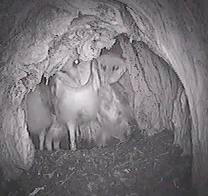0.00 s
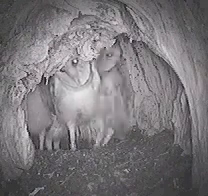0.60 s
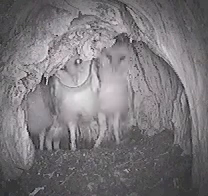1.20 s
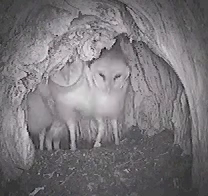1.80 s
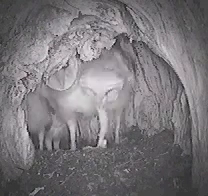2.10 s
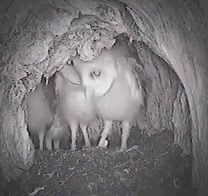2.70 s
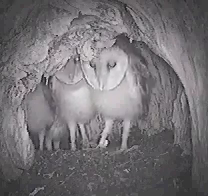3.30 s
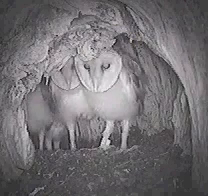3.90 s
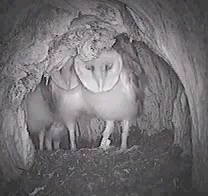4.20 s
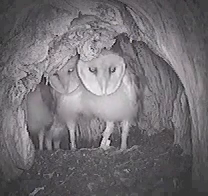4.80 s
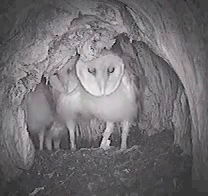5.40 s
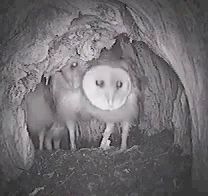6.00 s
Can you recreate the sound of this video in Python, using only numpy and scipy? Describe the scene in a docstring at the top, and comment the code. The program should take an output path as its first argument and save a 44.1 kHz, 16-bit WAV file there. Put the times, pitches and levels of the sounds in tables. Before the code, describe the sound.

Inside a hollow tree, a barn owl chick begs close to a nest camera's microphone. It gives five rasping hisses, about one a second, each swelling and breaking off. A soft bill cluck follows each of the last two. Then a second chick further back gives one weaker, thinner hiss. The sound is quiet and nearly dry, over a steady hush with a trace of electrical hum.

```python
"""Five rasping hisses swell and break off: a barn owl chick begs in a hollow tree, by a nest camera.
Soft bill clucks follow the last two, then a weaker, thinner hiss comes from a chick further back.
Each hiss is air chopped by an uneven flutter of the syrinx and coloured by the throat.
The hollow hums along with the near chick, over a steady hush and a trace of electrical hum."""
import sys
import numpy as np
from scipy import signal
from scipy.fft import rfft, irfft
from scipy.io import wavfile
from scipy.ndimage import uniform_filter1d

SR = 44100
rng = np.random.default_rng(int(sys.argv[2]) if len(sys.argv) > 2 else 0)


def store_pcm(level_fs):
    """Save levels as 16-bit WAV."""
    pcm = np.round(np.clip(level_fs, -1, 1) * 32767).astype(np.int16)
    wavfile.write(sys.argv[1], SR, np.atleast_2d(pcm).T)


N = 268480
TIME = np.arange(N) / SR
BIN_HZ = np.fft.rfftfreq(N, 1 / SR)


def amp(db):
    return 10 ** (np.asarray(db) / 20)


def unit_rms(x):
    return x / np.sqrt(np.mean(x ** 2) + 1e-20)


def eq_curve(points):
    """Gain per bin from points joined on a log-frequency axis."""
    hz, db = np.transpose(points)
    return amp(np.interp(np.log(BIN_HZ + 1), np.log(hz), db))


def resonances(modes):
    """Gain per bin of a set of steep-sided resonances."""
    power = sum(amp(db) ** 2 / (1 + ((BIN_HZ - hz) / width) ** 2) ** 4 for hz, width, db in modes)
    return np.sqrt(power)


def colour(x, gain):
    """Minimum-phase filter with the given gain per bin; the result has unit rms."""
    log_gain = np.log(np.maximum(gain / gain.max(), 1e-5))
    mirrored = np.concatenate([log_gain, log_gain[-2:0:-1]])
    phase = -signal.hilbert(mirrored).imag[:len(gain)]
    return unit_rms(irfft(rfft(x) * gain * np.exp(1j * phase), N))


def background(hush_db=-65.5):
    """The bed: an even hush and a trace of electrical hum."""
    # tone of the hush: freq_hz, gain_db
    hush_eq = [(30, -13.5), (100, -12), (160, -7.5), (250, -1.5), (370, 1), (600, -3.5), (800, -5.5),
               (1150, -3), (1900, -3.5), (2600, -7.5), (4200, -9), (7000, -17.5), (9300, -25.5),
               (10500, -34.5)]
    # partials of the hum: pitch_hz, rms_db
    hum_partials = [(65.5, -88.5), (131, -97.5)]
    hush = amp(hush_db) * colour(rng.standard_normal(N), eq_curve(hush_eq))
    hum = sum(amp(db) * np.sqrt(2) * np.sin(2 * np.pi * hz * TIME) for hz, db in hum_partials)
    return hush + hum


def tree_reverb(x, wet_db=-20, t60_s=0.098, predelay_s=0.002):
    """Rotten wood and litter add only a short, weak tail."""
    t = TIME[:SR // 4]
    tail = rng.standard_normal(len(t)) * amp(-60 * t / t60_s) * (t > predelay_s)
    return x + amp(wet_db) * signal.fftconvolve(x, tail / np.linalg.norm(tail))[:N]


def bill_clucks(rise_s=0.0042, sag=0.19, sag_s=0.011, overtone_db=-7, overtone_s=0.025):
    """The bill shuts after a call: a brief falling note whose overtone dies first."""
    # soft clucks: start_s, level_db, pitch_hz
    clucks = [(3.563, -56, 1117), (4.513, -56, 1122)]
    out = np.zeros(N)
    for start_s, level_db, pitch_hz in clucks:
        age = np.maximum(TIME - start_s, 0)
        glide_hz = pitch_hz * (1 - sag * (1 - np.exp(-age / sag_s)))
        phase = 2 * np.pi * np.cumsum(glide_hz) / SR
        note = np.sin(phase) + amp(overtone_db) * np.exp(-age / overtone_s) * np.sin(2 * phase)
        out += amp(level_db) * age / rise_s * np.exp(1 - age / rise_s) * note
    return out


def hiss_stages(start_s, length_s, attack_s, release_s, tail_s, crest_share, level_db, swell_db,
                crest_gape_db, break_gape_db, crest_edge_db, break_edge_db):
    """Times, level, gape and edge of a hiss; gape is its middle band against the whole, edge its top."""
    crest_s = min(crest_share, 1) * length_s
    released_s = length_s + release_s
    # seven stages: first air, rasp catches, swell begins, crest, break, released, rest
    times = start_s + np.array([-0.057, 0, attack_s, crest_s, length_s, released_s, released_s + tail_s])
    levels_db = level_db + np.array([-33, -16.5 - swell_db, -swell_db, 0, -1, -22.5, -33])
    slack_db = -3.5  # gape while the syrinx is slack
    gape_db = [slack_db, slack_db, -4, crest_gape_db, break_gape_db, slack_db, slack_db]
    edge_db = [-2.5, -2.5, -7, crest_edge_db, break_edge_db, -4.5, -4.5]
    return times, levels_db, gape_db, edge_db


def envelope(times, levels_db, fade_s=0.016):
    """Level curve of one call, silent outside it."""
    gate = np.clip(np.minimum(TIME - times[0], times[-1] - TIME) / fade_s, 0, 1)
    return amp(np.interp(TIME, times, levels_db)) * gate


def airflow(times, level_db, swell_db, sag_db_per_s=39, stop_s=0.02):
    """Breath envelope: the air comes before the rasp, sags after the crest and outlasts the break."""
    first_air, _, swelling, crest, _, released, _ = times
    flow_times = [first_air, swelling, crest, released, released + stop_s]
    flow_db = [-10.5 - swell_db, -swell_db, 0, -sag_db_per_s * (released - crest), -27]
    return envelope(times, level_db + np.interp(times, flow_times, flow_db))


def syrinx_flutter(flaps_per_s, jitter, spread_db, puff_s):
    """The syrinx flaps unevenly; each flap opens it for a short puff."""
    gap, size = rng.standard_normal((6000, 2)).T
    periods = np.exp(jitter * gap - jitter ** 2 / 2)
    onsets = (np.cumsum(periods) * SR / flaps_per_s).astype(int)
    strengths = amp(spread_db * np.clip(size, -2, 2))
    flaps = np.bincount(onsets[onsets < N], strengths[onsets < N], N)
    return unit_rms(signal.lfilter([1], [1, -np.exp(-1 / (puff_s * SR))], flaps))


def turbulence(puffs, roughness):
    """Air through the fluttering gap: the less rough, the more of it leaks past steadily."""
    opening = roughness * puffs + 1 - roughness
    opening /= np.sqrt(uniform_filter1d(opening ** 2, size=800))  # the push behind it stays even
    return opening * rng.standard_normal(N)


def above(hz):
    """Gain per bin of a steep, smooth low cut."""
    return 1 / (1 + np.exp(np.clip((hz - BIN_HZ) / 60, -50, 50)))


def throat_rasp(air, throat, times, levels_db, gape_db, edge_db, low_cut_hz, middle_hz=4400, top_hz=6400):
    """Air rings the throat; gape sets the middle band's share and edge the top's."""
    spectrum = rfft(colour(air, resonances(throat) * above(low_cut_hz)))
    bands = 1 - above(middle_hz), above(middle_hz) - above(top_hz), above(top_hz)
    low, middle, top = (irfft(spectrum * band, N) for band in bands)
    middle_gain = amp(np.interp(TIME, times, gape_db))
    top_gain = amp(np.interp(TIME, times, edge_db))  # most hisses dull as they swell
    spare_power = 1 - middle_gain ** 2 - top_gain ** 2
    low_gain = np.sqrt(np.clip(spare_power, np.var(low) / 2, 2 * np.var(low)))
    rasp = low_gain * unit_rms(low) + middle_gain * unit_rms(middle) + top_gain * unit_rms(top)
    return envelope(times, levels_db) * rasp


def far_chick():
    """One weaker, thinner hiss from further back, with a slower flutter."""
    # the hiss: start_s, length_s, attack_s, release_s, tail_s, crest_share, level_db, swell_db,
    # crest_gape_db, break_gape_db, crest_edge_db, break_edge_db
    call = (5.186, 0.48, 0.032, 0.05, 0, 0.76, -52.3, 11.8, 0, -0.5, -9.5, -9)
    # throat resonances: centre_hz, width_hz, gain_db
    throat = [(4790, 370, 1), (5220, 430, 1.5), (5840, 450, -2.5), (6480, 320, -3.5), (7050, 430, -7.5),
              (8040, 200, -9), (8700, 140, -31)]
    puffs = syrinx_flutter(flaps_per_s=260, jitter=0.42, spread_db=1.5, puff_s=0.0026)
    air = turbulence(puffs, roughness=0.58)
    return throat_rasp(air, throat, *hiss_stages(*call), low_cut_hz=4400)


def near_chick(rasp_trim_db=0.61):
    """Five hisses: the rasp on top, rushing breath under it, windpipe and hollow sounding along."""
    # one hiss a row: start_s, length_s, attack_s, release_s, tail_s, crest_share, level_db (before trim),
    # swell_db, crest_gape_db, break_gape_db, crest_edge_db, break_edge_db, flow_db, flow_swell_db,
    # roughness (0-1), hollow_db, windpipe_db (the last two against the airflow)
    calls = [ (0.450, 0.46, 0.02, 0.027, 0.072, 0.94, -43.1, 8.7, -1.3, -7, -12.5, -12.5, -58, 0, 0.42, -10.5, -26),
             (1.459, 0.38, 0.041, 0.04, 0.042, 0.85, -43.3, 5, -2.4, -5.5, -12, -15, -58, 0, 0.54, -9.5, -30),
             (2.296, 0.446, 0.021, 0.031, 0.016, 0.84, -44, 7.5, -0.6, -1, -13, -13, -57, 5, 0.7, -10.5, -36),
             (3.091, 0.402, 0.055, 0.073, 0.023, 0.63, -42.1, 10.2, -4.5, -0.7, -5.5, -11.5, -54, 6.5, 0.4, -4, -9),
             (4.038, 0.41, 0.0084, 0.035, 0.018, 0.76, -45.5, 7, -1.6, -2, -7, -5.7, -59.6, 3, 0.5, -7.5, -35)]
    # throat resonances, one set per hiss: centre_hz, width_hz, gain_db
    throats = [
        [(3970, 420, 3), (4470, 520, -2), (5030, 440, -6), (5660, 310, 1.5), (6050, 270, -3), (6730, 210, -11),
         (7130, 88, -6.5), (7620, 350, -7.5), (8590, 220, -15.5), (9410, 280, -21.5)],
        [(3975, 400, -1), (4500, 350, -5.5), (5010, 290, -6), (5670, 670, -4.5), (6640, 120, -10.5),
         (7080, 190, -12.5), (7640, 320, -10), (8800, 320, -23.5), (9370, 320, -25.5)],
        [(3970, 310, -3), (4800, 750, 2), (5620, 270, 2.5), (5960, 270, -1), (6730, 420, -10.5),
         (7460, 210, -8.5), (7800, 150, -7.5), (8400, 130, -19.5), (9270, 330, -23.5)],
        [(3920, 530, -2), (4480, 550, -2.5), (5010, 400, -2.5), (5600, 500, -4), (6000, 300, -4.5),
         (6700, 520, -3.5), (7440, 1100, -6), (8100, 380, -7), (9110, 450, -14)],
        [(4020, 390, -1), (4710, 750, 1), (5980, 550, 0.5), (6860, 310, -5.5), (7350, 300, -6),
         (7750, 320, -8.5), (9050, 270, -17.5), (9600, 200, -21.5)],
    ]
    # tone of the air rushing through the open bill: freq_hz, gain_db
    rush_eq = [(800, -25.5), (1100, -14.5), (1400, -18), (1700, -22), (1950, -6), (2200, 1.5), (2430, -2),
               (2700, .5), (2960, -12.5), (3170, -10), (3420, -15), (3650, -15), (4000, -8), (8000, -31),
               (10000, -33)]
    # the windpipe's ring near 3.2 kHz, heard mainly in the fourth hiss: centre_hz, width_hz, gain_db
    windpipe_modes = [(3170, 290, 0)]
    # the hollow's low resonances: centre_hz, width_hz, gain_db
    hollow_modes = [(351, 130, -4.5), (440, 147, 0.5), (704, 340, -15), (1114, 325, -8)]
    puffs = syrinx_flutter(flaps_per_s=340, jitter=0.38, spread_db=1.3, puff_s=0.0015)
    breath = turbulence(puffs, roughness=0.45)
    rush = colour(breath, eq_curve(rush_eq))
    windpipe = colour(breath, resonances(windpipe_modes))
    hollow = colour(rng.standard_normal(N), resonances(hollow_modes))
    out = np.zeros(N)
    for (*call, flow_db, flow_swell_db, roughness, hollow_db, windpipe_db), throat in zip(calls, throats):
        times, levels_db, gape_db, edge_db = hiss_stages(*call)
        air = turbulence(puffs, roughness)
        rasp = throat_rasp(air, throat, times, levels_db, gape_db, edge_db, low_cut_hz=3614)
        body = rush + amp(windpipe_db) * windpipe + amp(hollow_db) * hollow
        out += amp(rasp_trim_db) * rasp + airflow(times, flow_db, flow_swell_db) * body
    return out


def scene():
    """Both chicks in the hollow tree, over the background, in mono."""
    chicks = near_chick() + far_chick() + bill_clucks()
    return (tree_reverb(chicks) + background())[None]


def record(dry):
    """The camera cuts the top treble; its input sits slightly off zero."""
    cutoff_hz, dc_offset = 10600, -0.0029
    lowpass = signal.firwin(255, cutoff_hz, window=("kaiser", 8), fs=SR)
    return dc_offset + signal.oaconvolve(dry, lowpass[None], "same")


dry = scene()
out = record(dry)
store_pcm(out)
```